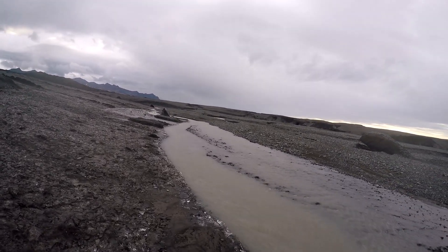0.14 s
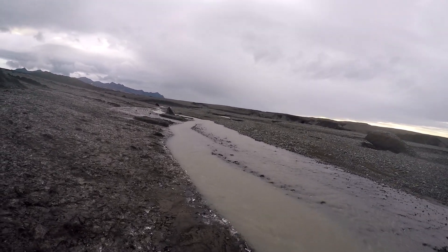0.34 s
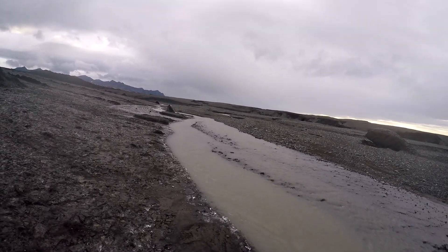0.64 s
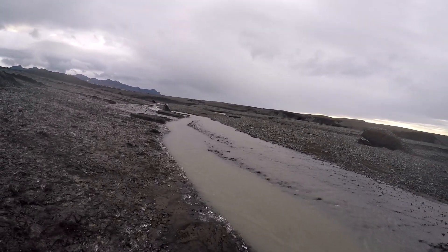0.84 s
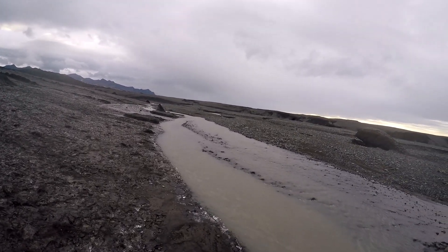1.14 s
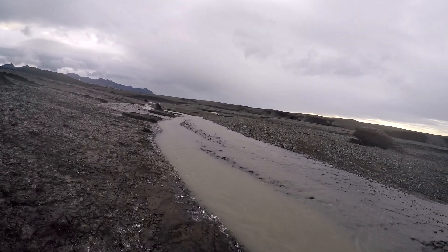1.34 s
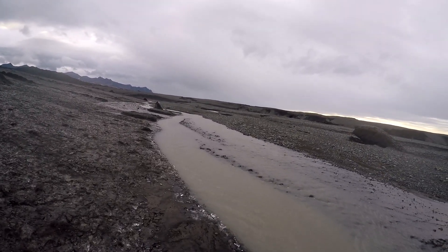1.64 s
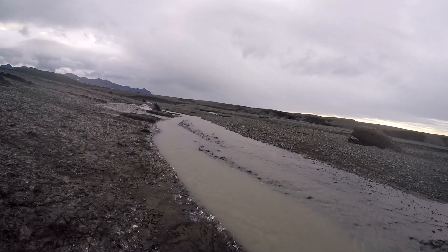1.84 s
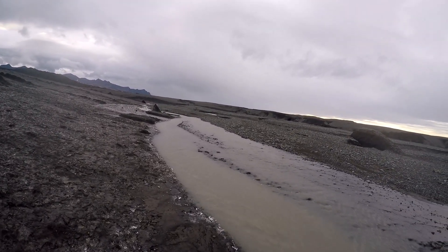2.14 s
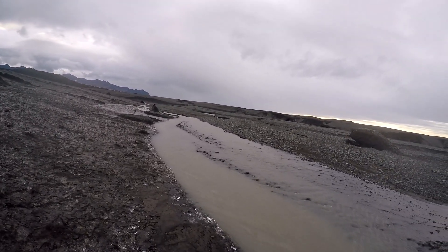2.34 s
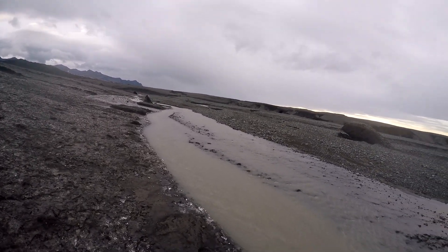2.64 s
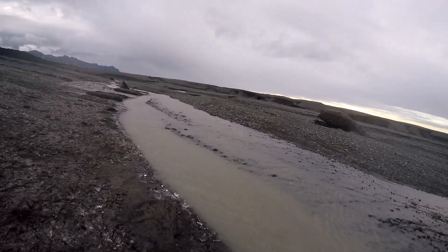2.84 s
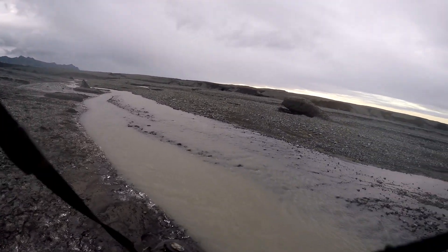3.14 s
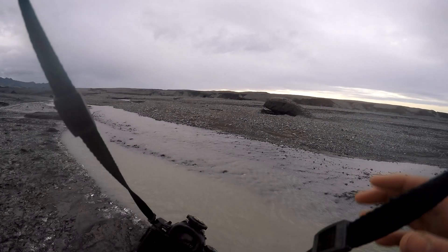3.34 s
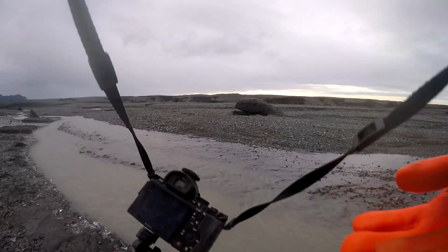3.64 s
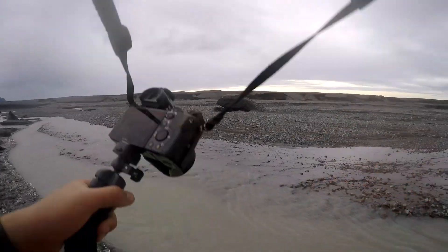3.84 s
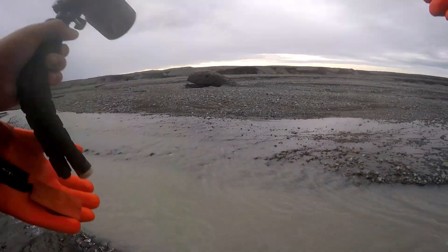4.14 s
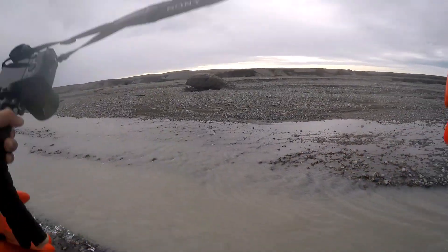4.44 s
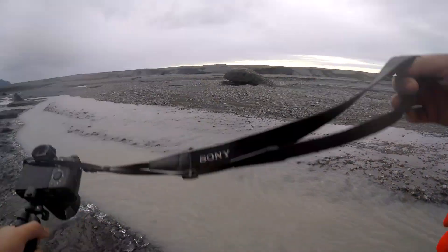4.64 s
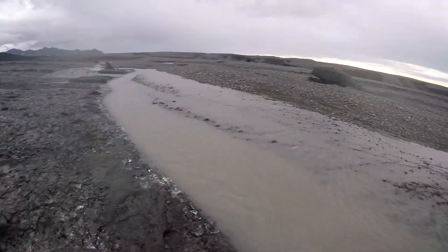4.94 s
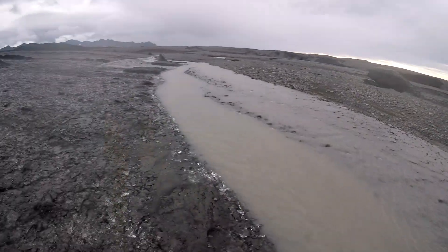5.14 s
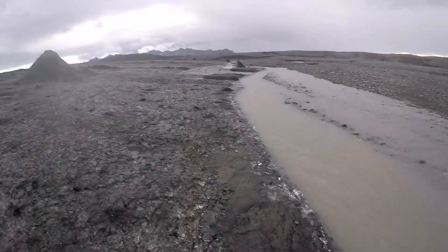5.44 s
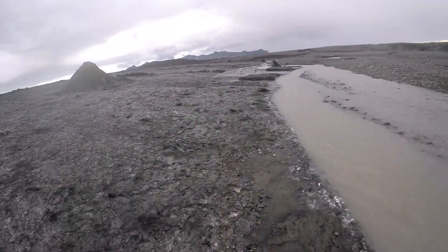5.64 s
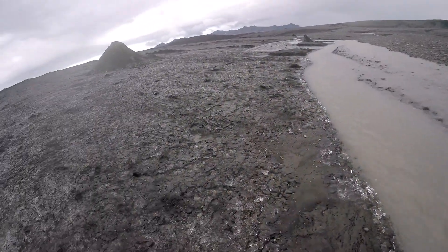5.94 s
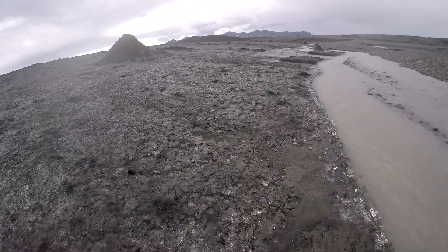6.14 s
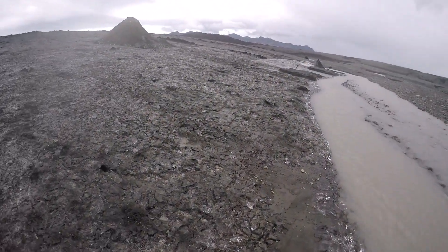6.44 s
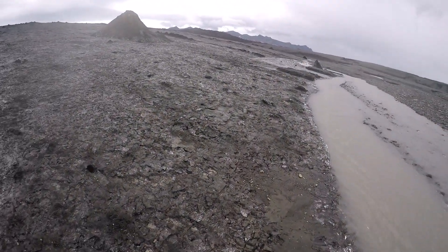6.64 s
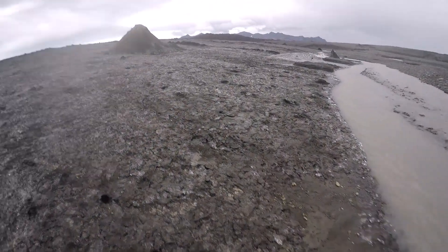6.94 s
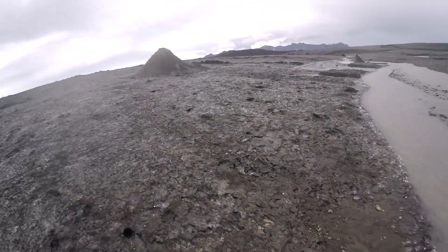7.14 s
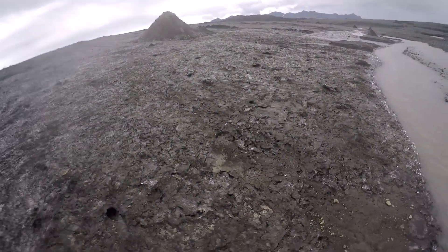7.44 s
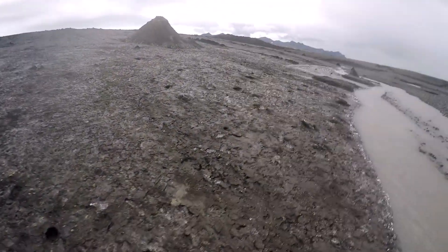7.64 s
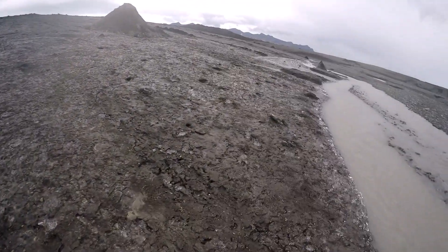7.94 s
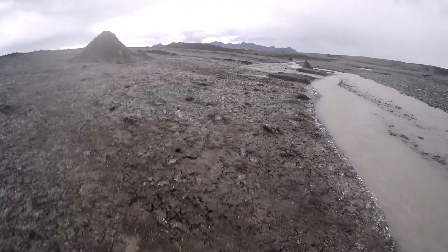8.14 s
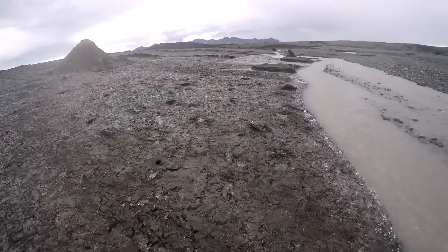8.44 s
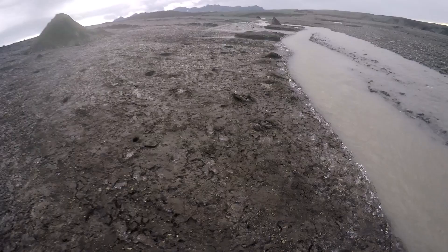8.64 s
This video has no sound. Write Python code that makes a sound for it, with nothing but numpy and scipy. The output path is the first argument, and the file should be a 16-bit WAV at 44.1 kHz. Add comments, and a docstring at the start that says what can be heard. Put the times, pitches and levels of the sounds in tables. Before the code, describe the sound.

A wearer stands nearly still on open icy ground, the microphone fixed to the body: quiet hiss, low throbbing, tiny clicks. A strap is lifted off, scraping and banging the plastic casing loudly. Short ratcheting creaks and dull cloth scuffs accompany the arm movements, then walking brings rumbling body sway, more creaking and sharp, brittle spike crunches, strongest towards the end.

```python
"""First come a quiet hiss, a deep throb and a brush of cloth, then a short creak: the mount of a body-worn camera.
A walker in crampons and waterproofs stands on gritty glacier ice, lifts a strap over the head and walks on.
The mount sticks and slips, and each slip rings the plastic case; near three seconds the strap scrapes and knocks it.
Sparse random clicks make the friction of cloth and strap and the crunch of spikes in ice.
Filtered noise makes the dull sway of the body, and short low tones make the throb."""
import sys
import numpy as np
from scipy import signal
from scipy.fft import rfft, irfft, next_fast_len
from scipy.io import wavfile
from scipy.ndimage import uniform_filter1d

SR = 44100
rng = np.random.default_rng(int(sys.argv[2]) if len(sys.argv) > 2 else 0)


def int16_out(signal):
    """Quantize to a 16-bit WAV file."""
    q = np.round(np.clip(np.atleast_2d(signal).T, -1, 1) * 32767)
    wavfile.write(sys.argv[1], SR, q.astype(np.int16))


N = 388521
TIME = np.arange(N) / SR  # seconds


def amp(db):
    """Turns decibels into gain."""
    return 10 ** (np.asarray(db) / 20)


def evened(x):
    """Scales a sound to an rms of one."""
    return x / np.sqrt(np.mean(x ** 2) + 1e-20)


def curve(rows):
    """Joins (time, value) points by straight lines, giving a value at every sample."""
    times, values = np.transpose(rows)
    return np.interp(TIME, times, values)


def add(mix, start_s, sound):
    """Lays a sound into the mix at its start time."""
    part = mix[max(round(start_s * SR), 0):][:len(sound)]
    part += sound[:len(part)]


def coloured(x, points):
    """Filters x by a smooth curve of (pitch, level) points, then evens it."""
    hz, db = np.transpose(points)
    bins_hz = np.fft.rfftfreq(len(x), 1 / SR)
    gain = amp(np.interp(np.log(bins_hz + 1), np.log(hz), db))
    return evened(irfft(rfft(x) * gain, len(x)))


def noise(points):
    """Makes steady random noise with a given spectrum."""
    return coloured(rng.standard_normal(next_fast_len(N)), points)[:N]


def ring(modes, bright_db=0, size=3000):
    """A tap on a body: each mode is a dying sine, and neighbours move in opposite directions; peak one."""
    t = np.arange(size) / SR
    out = np.zeros(size)
    for k, (hz, width_hz, db) in enumerate(modes):
        # brightness tilts the levels around 1400 Hz, but no further below 700 or above 2600 Hz
        octaves = np.log2(np.clip(hz, 700, 2600) / 1400)
        strength = amp(db + bright_db * octaves) * width_hz
        decay = np.exp(-np.pi * width_hz * t)  # a wider mode dies sooner
        out += (-1) ** k * strength * decay * np.sin(2 * np.pi * hz * t)
    return out / abs(out).max()


def grains(size, per_s, spread_db):
    """Scatters sparse clicks of random sign, mostly small and a few large."""
    strength = amp(spread_db * np.minimum(rng.exponential(1, size), 4))
    sign = rng.choice([-1., 1.], size)
    return strength * sign * (rng.random(size) < per_s / SR)


def swells(rows):
    """Adds up the power of smooth swells, each centred on its time; 1/e at half_s to either side."""
    return sum(amp(2 * db) * np.exp(-np.minimum(((TIME - s) / half_s) ** 2, 60))
               for s, db, half_s in rows)


# spectrum of the hiss: pitch_hz, level_db (relative)
HISS_COLOUR = [(88, -44), (150, -2), (481, -10), (912, -9), (1370, -9.5), (1540, -9.5), (1980, -9),
               (2310, -8), (3480, -14), (3910, -6.5), (5990, -17.5), (6600, -11.5), (7270, -21),
               (13800, -23.5), (15500, -29)]
# faint electronic tones: pitch_hz, level_db (rms)
WHINE_TONES = [(2326, -80.5), (6422, -82.5), (6648, -86), (6675, -76), (13324, -87.5)]


def hiss(level_db=-62.5):
    """The microphone's own hiss is steady noise; its faint whine is a few steady sines."""
    whine = sum(amp(db) * np.sqrt(2) * np.sin(2 * np.pi * hz * TIME) for hz, db in WHINE_TONES)
    return amp(level_db) * noise(HISS_COLOUR) + whine


# strength of the throb, weaker while the arms are raised: time_s, level_db (before random scatter)
THROB_STRENGTH = [(0, -36.5), (2.6, -36.5), (4.2, -41), (4.7, -41), (5.5, -37.5), (8.8, -36)]


def throb(first_s=0.019, every_s=0.423, half_s=0.061, pitch_hz=30.3, scatter_db=1.5, detune=0.14):
    """An even, deep throb, probably the walker's pulse pushing on the mount: swelling bursts of a low sine."""
    out = np.zeros(N)
    for s in np.arange(first_s, N / SR, every_s):
        near = abs(TIME - s) < every_s / 2
        age = TIME[near] - s
        size, pitch, phase = rng.standard_normal(3)
        push = np.sin(2 * np.pi * (pitch_hz * np.exp(detune * pitch) * age + phase))
        out[near] += amp(scatter_db * size) * np.exp(-(age / half_s) ** 2) * push
    return amp(curve(THROB_STRENGTH)) * out


# spectrum of the body's rumble: pitch_hz, level_db (relative)
SWAY_SPECTRUM = [(10, -19.5), (22, 1.5), (33, -5), (55, -7.5), (80, -15.5), (120, -20.5), (200, -36),
                 (400, -43), (900, -77)]
# shifts of the body's weight: centre_s, level_db, half_s
WEIGHT_SHIFTS = [(3.09, -31, 0.1), (5.15, -41.5, .25), (5.51, -36, 0.065), (6.33, -37.5, 0.05),
                 (6.72, -40, 0.11), (7.01, -33, 0.075), (7.66, -36, 0.066), (8.05, -37, 0.055),
                 (8.2, -35, 0.065), (8.49, -38.5, 0.041), (8.8, -40, 0.057)]
# restlessness of the body, also the jacket's constant light rubbing: time_s, level_db (relative)
RESTLESSNESS = [(0, -72), (0.3, -77.5), (2.47, -75.5), (2.62, -50.5), (3.3, -52.5), (3.76, -59),
                (4.05, -49), (4.6, -50.5), (5.3, -58), (5.62, -57.5), (6.02, -64.5), (6.3, -53.5),
                (7.2, -48.5), (7.31, -55.5), (7.45, -47), (7.87, -53.5), (8.2, -49.5), (8.81, -55.5)]


def sway(still_db=-53, restless_db=2, size=2500):
    """Body movement reaches the microphone as a soft, lumpy rumble that swells with each shift of weight."""
    rumble = noise(SWAY_SPECTRUM)
    rumble = rumble / np.sqrt(uniform_filter1d(rumble ** 2, size) + 0.15)  # tames the largest lumps
    restless_power = amp(2 * (curve(RESTLESSNESS) + restless_db))
    power = swells(WEIGHT_SHIFTS) + amp(2 * still_db) + restless_power
    return np.sqrt(power) * rumble


# waterproof cloth sliding as an arm or leg swings: centre_s, level_db, half_s
CLOTH_SWISHES = [(2.8, -65, 0.072), (3.48, -56.5, 0.03), (3.86, -52.5, 0.067), (4.26, -52.5, 0.17),
                 (5.05, -59.5, .18), (6.18, -62, 0.081), (6.38, -56, 0.065), (6.95, -60, 0.11),
                 (7.46, -61, 0.059), (7.72, -65, 0.099), (8.12, -57, 0.092), (8.54, -64, 0.055),
                 (8.8, -50.5, 0.062)]
# spectrum of the sliding weave: pitch_hz, level_db (relative)
WEAVE_COLOUR = [(2500, 3), (3900, 10.5), (5000, 2), (6500, 1), (8100, -4.5), (9500, -6.5), (11200, -4),
                (13000, -16), (16000, -21)]


def jacket_swish(light_db=-18):
    """The sliding weave makes a thin swish from dense, coloured clicks; light rubbing adds a little."""
    weave = coloured(grains(next_fast_len(N), per_s=9000, spread_db=6.0), WEAVE_COLOUR)[:N]
    light_power = amp(light_db + curve(RESTLESSNESS)) ** 2
    return np.sqrt(swells(CLOTH_SWISHES) + light_power) * weave


def stroke(start_s, length_s, attack_s=0.013, release_s=0.011):
    """Loudness of one rub: the cloth takes hold, slides evenly and lets go."""
    age = TIME - start_s
    take_hold = np.clip(age / attack_s, 0, 1)
    let_go = np.exp(-np.clip((age - length_s) / release_s, 0, 20))
    return take_hold * let_go


def shifting(x, depth_db):
    """The point of contact wanders, so resonances come and go for a few hundredths of a second."""
    z = signal.stft(x, nperseg=512, noverlap=384)[2]
    patches = uniform_filter1d(rng.standard_normal(z.shape), size=4, axis=0)  # across pitch
    patches = evened(uniform_filter1d(patches, size=18, axis=1))  # across time
    return evened(signal.istft(z * amp(depth_db * patches), nperseg=512, noverlap=384)[1][:N])


# strokes of the jacket across the mount:
# start_s, length_s, level_db (relative), harshness_db (extra treble), scuff_pitch_hz (before random detuning)
JACKET_STROKES = [(0.0, 0.04, -56, 6, 1600), (0.367, 0.038, -60, 11, 700), (2.716, 0.14, -45.5, 13.5, 2600),
                  (2.849, 0.14, -44, 6, 1047), (3.444, 0.093, -47.5, 3, 1040), (3.821, 0.08, -41, -5, 1052),
                  (3.919, 0.065, -40, 2, 975), (4.805, 0.065, -44, 2, 900), (4.968, 0.13, -45.5, 4, 860),
                  (5.125, 0.073, -51, 7.5, 1030), (5.479, 0.09, -42.5, -3, 960),
                  (5.661, 0.031, -50, 6, 2600), (5.891, 0.042, -52.5, 6.5, 1050),
                  (6.295, 0.0352, -46, 2, 1080), (6.359, 0.06, -47, 6, 680), (6.475, 0.032, -46, -6, 556),
                  (6.588, 0.2, -47.5, 0.5, 930), (6.808, 0.1256, -44, -4, 850), (6.954, 0.07, -48, -4, 650),
                  (7.048, 0.05, -39, -7, 918), (7.454, 0.15, -43, 6.5, 953),
                  (7.616, 0.055, -41.5, 8.5, 2288), (7.713, 0.076, -46, 4, 995),
                  (7.966, 0.019, -45.5, 4, 2344), (8.04, 0.13, -42.5, 9, 849), (8.23, 0.085, -41.5, 2, 780),
                  (8.391, 0.1, -48.5, 1, 1066), (8.595, 0.12, -42.5, 7.5, 960),
                  (8.751, 0.043, -50.5, 5, 1000)]
# low part of the rubbing: pitch_hz, level_db (relative)
RUB_BASS_COLOUR = [(40, -39), (90, -3), (150, 8), (250, -9.5), (400, -0.5), (700, -15), (2000, -61)]
# the case as the mount and the cloth ring it: pitch_hz, width_hz, level_db (relative, before brightness)
CASE_MODES = [(387, 126, -9), (593, 166, -5.5), (973.3, 127.5, 5.5), (1151, 138, -2), (1581, 109, 2),
              (2121, 34, -2.5), (2262, 49, -0.5), (2526, 486, -3), (2865, 354, -2.5), (3920, 93, -20.5),
              (4550, 89, -23.5), (5270, 170, -21.5), (5675, 160, -22.5), (7830, 3700, -46.5),
              (11000, 4600, -58.5)]


def jacket_rub(rub_db=-1, bright_db=-3, bass_db=-9, light_harsh_db=7, split_hz=1500, hollow_db=-9,
               slips_per_s=1800, typical_db=-45):
    """Tiny slips of cloth sound through the case, sparse when the cloth barely moves."""
    light = amp(curve(RESTLESSNESS))
    power, harsh_power = light ** 2, (light * amp(light_harsh_db)) ** 2
    for start_s, length_s, db, harsh_db, _ in JACKET_STROKES:
        stroke_power = (amp(db) * stroke(start_s, length_s)) ** 2
        power = power + stroke_power
        harsh_power = harsh_power + stroke_power * amp(2 * harsh_db)
    level, harsh_level = np.sqrt(power), np.sqrt(harsh_power)
    density = slips_per_s * np.sqrt(level / amp(typical_db))
    # broad contact favours the hollow of the case
    body = ring(CASE_MODES, bright_db) + amp(hollow_db) * ring([(1105, 74, 0)])
    slips = grains(N, density, spread_db=6.0) / np.sqrt(density)
    friction = shifting(signal.oaconvolve(slips, body)[:N], depth_db=3.5)
    upper = signal.sosfiltfilt(signal.butter(2, split_hz, "high", fs=SR, output="sos"), friction)
    lower = friction - upper + amp(bass_db) * noise(RUB_BASS_COLOUR)
    return amp(rub_db) * (level * lower + harsh_level * upper)


def scuffs(scuff_db=-5, width_hz=130, slips_per_s=1500, detune=0.027):
    """Each jacket stroke presses on its own spot and draws a short, rough note from it."""
    out, release = np.zeros(N), SR // 10
    for start_s, length_s, db, _, hz in JACKET_STROKES:
        envelope = stroke(start_s, length_s)[max(round(start_s * SR), 0):]
        envelope = envelope[:round(length_s * SR) + release]
        mode = ring([(hz * (1 + detune * rng.standard_normal()), width_hz, 0)])
        friction = grains(SR // 2, per_s=slips_per_s, spread_db=4.5)
        note = signal.fftconvolve(friction, mode)[:len(envelope)]
        add(out, start_s, amp(db + scuff_db) * envelope * evened(note))
    return out


# spikes breaking the ice: start_s, peak_db, decay_s
ICE_CRUNCHES = [(5.332, -37, 0.015), (6.757, -36.5, 0.0064), (6.814, -36, 0.0077), (6.826, -38, 0.0029),
                (6.843, -28.5, 0.0085), (7.491, -31, 0.01), (7.64, -36, 0.012), (7.806, -42, 0.004),
                (7.89, -27, 0.0059), (8.095, -33, 0.0047), (8.135, -23, 0.0023), (8.1412, -17.5, 0.005),
                (8.233, -20, 0.0036), (8.32, -26, 0.0031), (8.625, -26.5, 0.031), (8.722, -27, 0.0082),
                (8.798, -24, 0.0083)]
# thin metal tinks of the spikes: start_s, peak_db, pitch_hz
SPIKE_TINKS = [(6.963, -46, 10740), (7.962, -49, 10760)]


def crampons(tink_decay_s=0.0068):
    """Each bite of the spikes is a dying shower of brittle grains; now and then steel tinks."""
    out, t = np.zeros(N), np.arange(SR // 5) / SR
    # modes of a breaking shard: pitch_hz, width_hz, level_db (relative)
    shard = ring([(2800, 710, 13.0), (4570, 1300, 8.5), (5850, 1270, 8.0),
                  (8800, 3600, 4.0), (10030, 3100, 4), (14000, 2800, -30.5)])
    for s, db, decay_s in ICE_CRUNCHES:
        breaking = grains(len(t), per_s=5000, spread_db=5.5) * np.exp(-t / max(decay_s, 1e-3))
        shower = signal.fftconvolve(breaking, shard)
        add(out, s, amp(db) * shower / abs(shower).max())
    for s, db, hz in SPIKE_TINKS:
        add(out, s, amp(db) * np.exp(-t / tink_decay_s) * np.sin(2 * np.pi * hz * t))
    return out


# the strap sliding over the case: centre_s, pressure_db (relative), half_s
STRAP_SCRAPES = [(2.971, -23.5, 0.0066), (2.987, -27, 0.003), (3.002, -19.5, 0.0056), (3.031, -21.5, 0.013),
                 (3.045, -13.5, 0.0093), (3.059, -24, 0.011), (3.082, -11.5, 0.006), (3.095, -18, 0.0046)]
# the case as the strap scrapes it: pitch_hz, width_hz, level_db (relative)
SCRAPED_MODES = [(991, 32, 9), (1545, 50, -8.5), (2580, 910, -11), (3860, 320, -19.5), (4820, 190, -4),
                 (6020, 330, -8.5), (6740, 270, -11.5), (12100, 3500, -35.5)]


def strap(catch_s=2.9632, catch_db=-2, catch_hz=960, catch_width_hz=170, hollow_db=-2, edge_db=-5.0,
          edge_growth=1.5):
    """Webbing catches on the case with a hollow tock and drags off it in jerks; the harder ones grate."""
    pressure = np.sqrt(sum(amp(2 * db) * np.exp(-((TIME - s) / half_s) ** 2)
                           for s, db, half_s in STRAP_SCRAPES))
    friction = grains(N, per_s=7000, spread_db=3.5)
    hollow = evened(signal.oaconvolve(friction, ring(SCRAPED_MODES[:1]))[:N])
    # the slipping locks onto the lowest mode, so its level is steadied
    hollow /= np.sqrt(uniform_filter1d(hollow ** 2, size=300) + 0.11)
    edge = evened(signal.oaconvolve(friction, ring(SCRAPED_MODES[1:]))[:N])
    grating = pressure.max() * (pressure / pressure.max()) ** edge_growth
    out = amp(hollow_db) * pressure * hollow + amp(edge_db) * grating * edge
    add(out, catch_s, amp(catch_db) * ring([(catch_hz, catch_width_hz, 0)]))
    return out


# blows of the strap and its buckle: start_s, crack_peak_db, brightness_db (per octave),
# thump_db, rattle_decay_s, contact_hardness_hz (a harder contact keeps more treble)
STRAP_BLOWS = [(3.082, -21, -17, -30, 0.0015, 12000), (3.112, -8.5, -7, -44, 0.0041, 15000),
               (3.12, -13.5, -1, -31, 0.0023, 15000), (3.1428, -2, -3.5, -17, 0.0027, 15000),
               (3.189, -14.5, -7, -33.5, 0.0021, 9000), (3.575, 5, -4, -2.5, 0.0075, 15000),
               (3.585, -4.5, -6.5, -58, 0.0048, 15000), (3.591, -2.5, 30, -21.5, 0.0055, 15000),
               (3.886, 3.5, -1, -37, 0.001, 7940)]
# the case under a direct blow: pitch_hz, width_hz, level_db (relative, before random scatter)
STRUCK_MODES = [(700, 243, -8), (977, 210, -2), (1510, 600, -2), (2010, 830, 0.5), (2440, 230, 6),
                (2870, 620, -1.5), (3660, 890, -6), (4520, 380, -5), (4850, 180, -2.5), (5570, 200, -5.5),
                (7900, 7000, -18.5), (13300, 4900, -20.5)]


def knocks(rattle=0.086, scatter_db=3.0, buzz=0.016, buzz_decay_s=0.0079, thump_hz=42, thump_width_hz=26,
           boom_hz=135, boom_width_hz=95, boom_db=3):
    """A sharp blow rings the case, loose parts rattle and buzz, and the whole camera bounces on its mount."""
    out, t = np.zeros(N), np.arange(SR // 10) / SR
    thump = ring([(thump_hz, thump_width_hz, 0)], size=len(t))
    thump += amp(boom_db) * ring([(boom_hz, boom_width_hz, 0)], size=len(t))
    for s, db, bright_db, thump_db, decay_s, hard_hz in STRAP_BLOWS:
        loose = rattle * np.exp(-t / max(decay_s, 1e-4)) + buzz * np.exp(-t / buzz_decay_s)
        force = rng.standard_normal(len(t)) * loose
        force[0] = 1  # the blow itself
        force = signal.lfilter(*signal.butter(2, min(hard_hz, SR / 2 - 1), fs=SR), force)
        modes = np.array(STRUCK_MODES, float)
        modes[:, 2] += scatter_db * rng.standard_normal(len(modes))  # each blow lands on another spot
        crack = signal.fftconvolve(force, ring(modes, bright_db))
        add(out, s, amp(db) * crack / abs(crack).max())
        # pushed in, then springing back
        add(out, s + 0.00158, amp(thump_db) * np.hanning(round(0.0032 * SR)))
        add(out, s + 0.00473, -amp(thump_db) * thump)
    return out


def slip(bright_db, scatter_db, detune, soft_hz=6300, fizz_db=-36, flex_hz=140, flex_width_hz=70, flex_db=-21):
    """One slip rings the case, a little differently each time, sheds a fizz of friction and flexes the mount."""
    modes = np.array(CASE_MODES, float)
    modes[:, 0] *= 1 + detune * rng.standard_normal(len(modes))
    modes[:, 2] += scatter_db * rng.standard_normal(len(modes))
    click = signal.lfilter(*signal.butter(N=4, Wn=soft_hz, fs=SR), ring(modes, bright_db))
    age = np.arange(len(click)) / SR / .002  # in steps of 2 ms
    grit = coloured(rng.standard_normal(len(click)), [(3000, -14.0), (4600, -9), (5400, 13),
                                                      (6400, -3.5), (11000, -8.5), (15000, -22.0)])
    fizz = amp(fizz_db) * grit * 2 * np.sqrt(age) * np.exp(-age)
    flex = amp(flex_db) * ring([(flex_hz, flex_width_hz, 0)])
    return click + fizz + flex


# single slips of the mount: start_s, level_db, brightness_db (per octave)
SINGLE_SLIPS = [(0.4092, -34, -4), (0.439, -44, 2), (0.542, -32.5, -3), (0.648, -40, -4), (0.7775, -35, 5),
                (0.807, -32, -0.5), (0.8688, -21, 1), (1.3889, -21.5, -0.5), (1.831, -28.5, -3),
                (1.8603, -32.5, -5), (2.111, -48, 2), (2.25, -44, 12), (2.4925, -30.5, -3),
                (2.5046, -24.5, 1.5), (2.5456, -30.5, -3), (2.7106, -25, -3), (2.947, -21.5, 0),
                (3.2622, -21.5, -1), (3.4342, -21.5, 2.5), (3.552, -25.5, -7), (4.313, -16.5, -2),
                (4.576, -19.5, -1), (4.9546, -18, -0.5), (5.0262, -22, -1), (5.2873, -17, -2),
                (5.509, -20, -2.5), (5.6274, -23, 1), (5.7704, -20, 0), (6.3692, -24, -3),
                (6.9754, -28, -3), (7.2078, -16, 1), (7.538, -21, -6), (8.3617, -29.5, -5),
                (8.5461, -16.5, 3), (8.5529, -13, 2), (8.6136, -14, 2)]
# creaks, where slips follow in a run: start_s, end_s, start_rate and end_rate (slips per second, before
# jitter and rounding), start_level_db, end_level_db (before random scatter), brightness_db (per octave)
CREAK_RUNS = [(0.078, 0.0983, 102, 95, -20.5, -30, -1.5), (2.5925, 2.606, 77, 153, -22.5, -28.5, -1),
              (2.619, 2.688, 143, 163, -33.5, -43, -9), (3.276, 3.3307, 200, 139, -22, -22.5, -4),
              (3.343, 3.3908, 38, 49, -15.5, -19, -0.5), (3.615, 3.678, 103, 133, -26.5, -30, -2.5),
              (3.91, 3.915, 144, 150, -20.5, -20.5, -4), (4.076, 4.0926, 173, 102, -14, -19.5, -1),
              (4.2312, 4.243, 210, 215, -10, -27.5, -.5), (4.2789, 4.302, 95, 235, -14, -13, -2.5),
              (4.3342, 4.3392, 170, 170, -10, -12.5, -2.5), (4.3524, 4.384, 122, 143, -12, -18, -1.5),
              (4.396, 4.4447, 49, 38, -14, -19.5, -1.5), (4.494, 4.5211, 64, 69, -16, -17.5, 0.5),
              (4.607, 4.6302, 115, 69, -22, -19.5, 0), (4.835, 4.844, 120, 142, -13, -18.5, -1),
              (5.545, 5.573, 520, 490, -32, -26.5, -5), (5.5789, 5.593, 141, 146, -20.5, -17, -1.5),
              (5.7795, 5.8392, 37, 34, -29, -29, 0), (6.0644, 6.0862, 68, 150, -13, -15, 1),
              (6.1035, 6.139, 145, 123, -13.5, -17, 0), (6.1501, 6.158, 117, 114, -14, -14, -0.5),
              (6.166, 6.211, 202, 213, -16, -14, -1.5), (6.2147, 6.2757, 155, 143, -17, -12.5, 0),
              (6.465, 6.503, 55, 48, -27.5, -29.5, 4), (6.6434, 6.6797, 40, 97, -22.5, -22.5, -3.5),
              (6.7386, 6.7623, 70, 102, -17.5, -28.5, -2.5), (7.12, 7.147, 115, 220, -32, -26.5, -3),
              (7.3496, 7.389, 56.5, 41.7, -19, -11.5, 1.5), (7.3977, 7.452, 96, 175, -12.5, -14, 0),
              (7.555, 7.5726, 230, 206, -24.5, -18.5, 0), (7.711, 7.7892, 76, 88, -24.5, -22.5, -.5),
              (7.9455, 7.979, 111, 78, -23, -21, -3), (8.0177, 8.0574, 65, 43, -20, -16, -1.5),
              (8.4501, 8.496, 61, 36, -17.5, -17.5, 0), (8.62, 8.663, 223, 215, -20, -27.5, -1.5),
              (8.677, 8.716, 119, 53, -24.5, -16.5, 2), (8.7668, 8.796, 116, 48, -16.5, -16, 2.5)]


def mount(jitter=0.06, uneven_db=1.1, fizz_db=-35, fizz_db_per_octave=3, typical_per_s=120,
          tock_hz=690, tock_width_hz=130, tock_db=-40):
    """The joint sticks and slips: singly under slow strain, in runs under fast; quicker runs shed more fizz."""
    out = np.zeros(N)
    for s, db, bright_db in SINGLE_SLIPS:
        add(out, s, amp(db) * slip(bright_db, scatter_db=3.0, detune=0.014))
        # the joint reseats with a small tock, heard in the softest slips
        add(out, s, amp(tock_db) * ring([(tock_hz, tock_width_hz, 0)]))
    for start_s, end_s, rate0, rate1, db0, db1, bright_db in CREAK_RUNS:
        rate = np.sqrt(rate0 * rate1)
        count = max(round((end_s - start_s) * rate), 1)
        gaps = np.exp(jitter * rng.standard_normal(count)) / np.geomspace(rate0, rate1, count)
        run_fizz_db = fizz_db + fizz_db_per_octave * np.log2(rate / typical_per_s)
        for share in np.append(0, np.cumsum(gaps)) / gaps.sum():  # from 0 at the start to 1 at the end
            db = db0 + (db1 - db0) * share + uneven_db * rng.standard_normal()
            sound = slip(bright_db, scatter_db=2.0, detune=0.0029, fizz_db=run_fizz_db)
            add(out, start_s + (end_s - start_s) * share, amp(db) * sound)
    return out


def scene():
    """Everything as it reaches the one microphone, from the background to the mount."""
    background = hiss() + throb() + sway()
    clothing = jacket_swish() + jacket_rub() + scuffs()
    return (background + clothing + crampons() + strap() + knocks() + mount())[None]


def record(dry, ceiling=0.93, edge_hz=15600):
    """The hardest knocks overload the input and are rounded off; then a filter removes the highest treble."""
    clipped = dry / (1 + (dry / ceiling) ** 6) ** (1 / 6)
    lowpass = signal.firwin(255, edge_hz, window=("kaiser", 9), fs=SR)
    return signal.oaconvolve(clipped, lowpass[None], "same")


dry = scene()
out = record(dry)
int16_out(out)
```